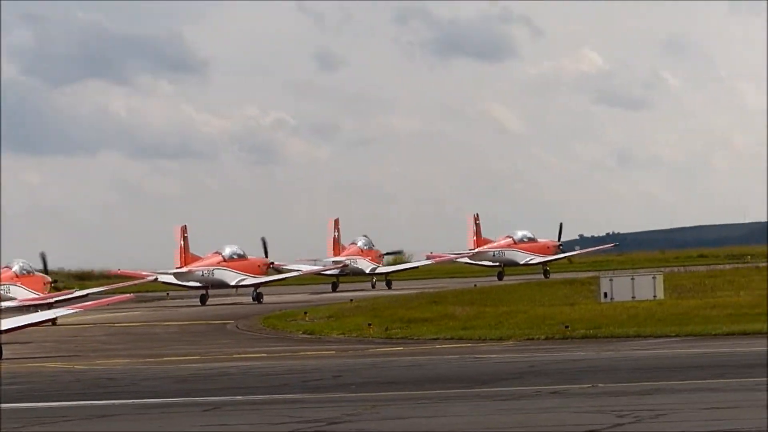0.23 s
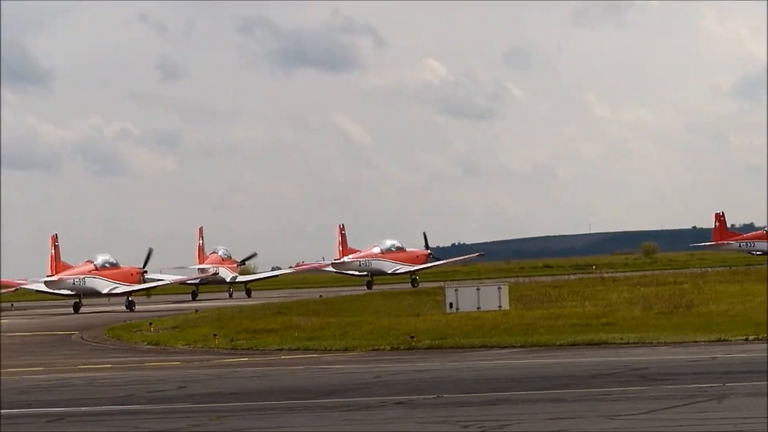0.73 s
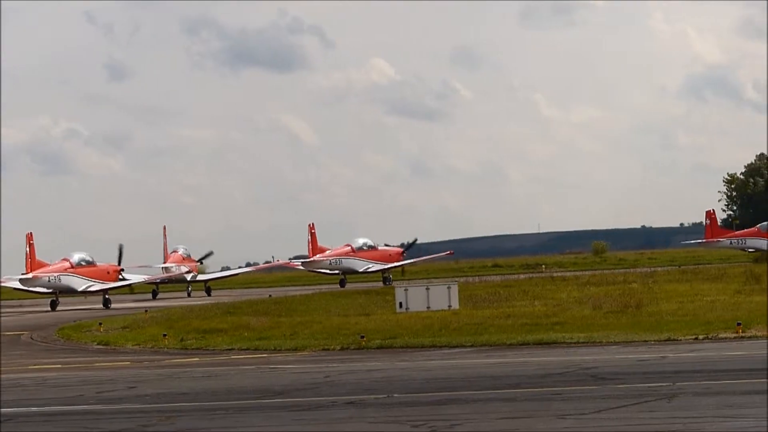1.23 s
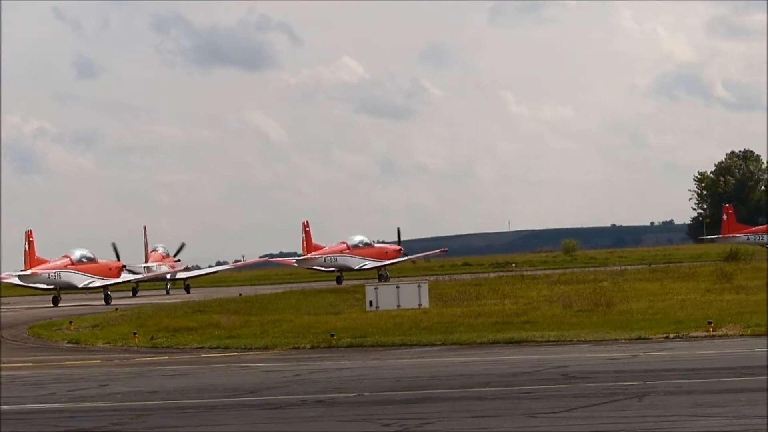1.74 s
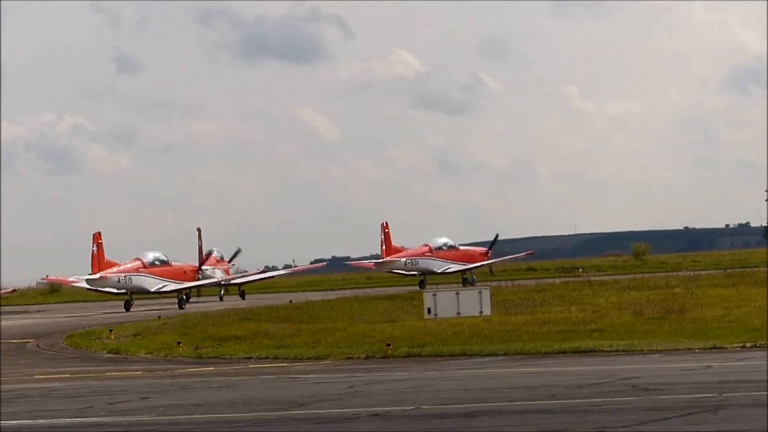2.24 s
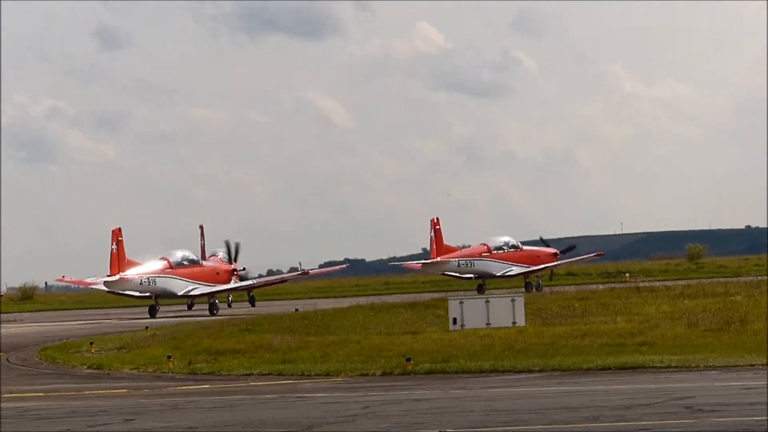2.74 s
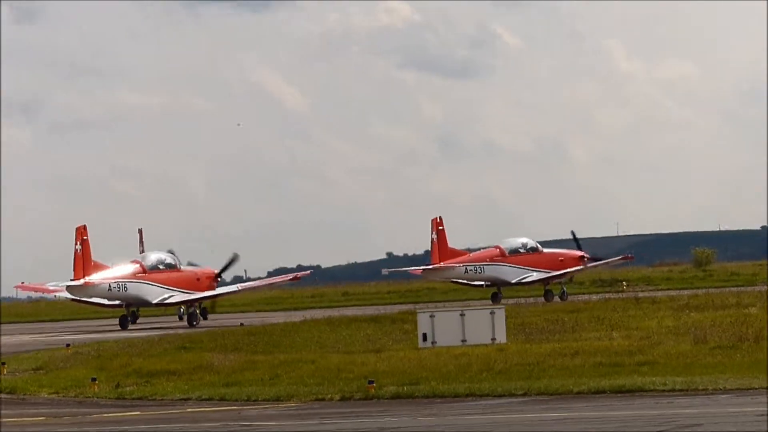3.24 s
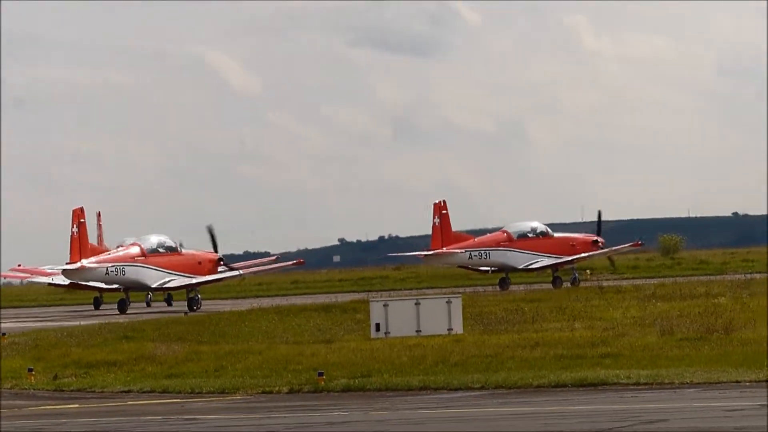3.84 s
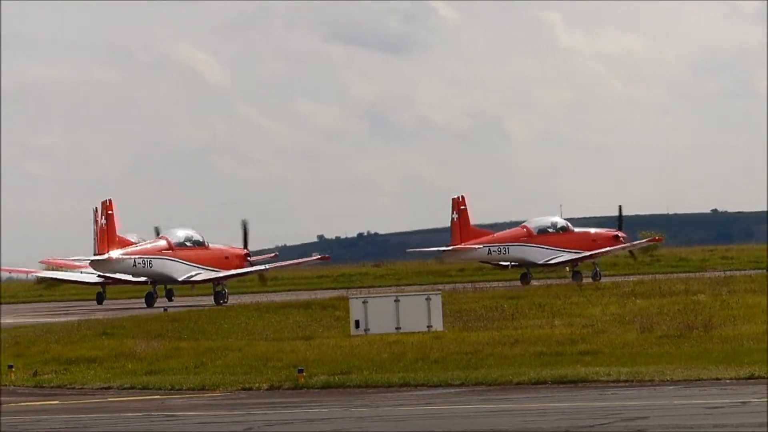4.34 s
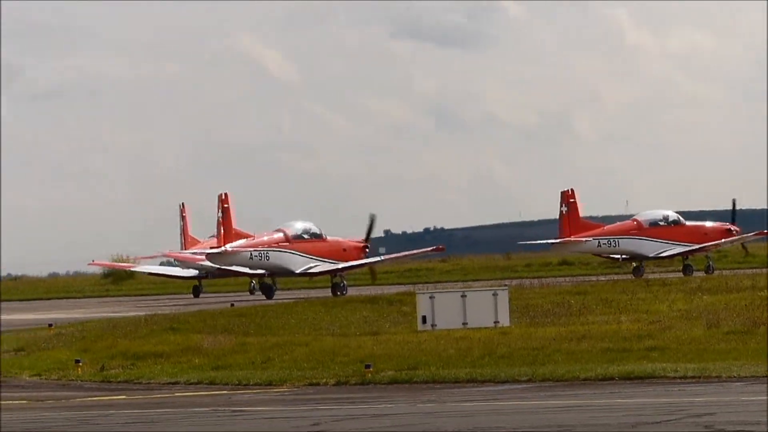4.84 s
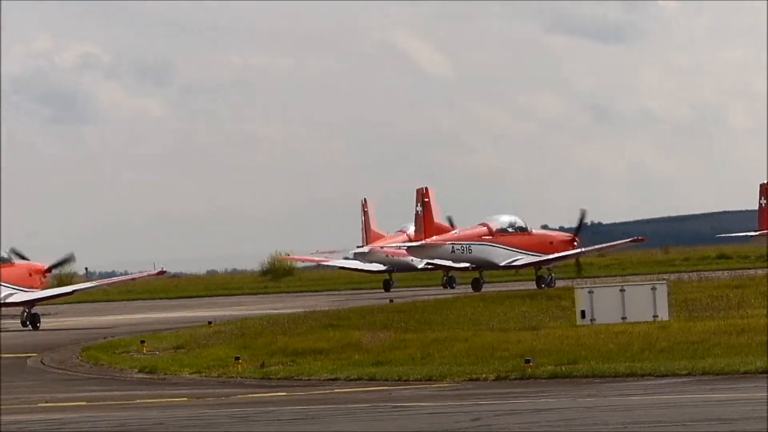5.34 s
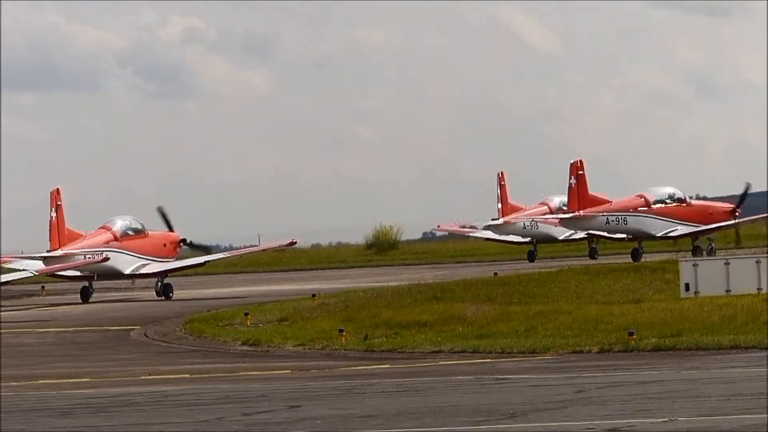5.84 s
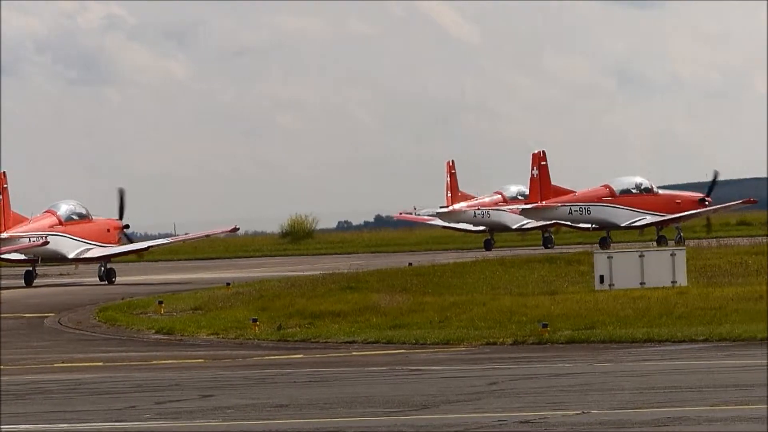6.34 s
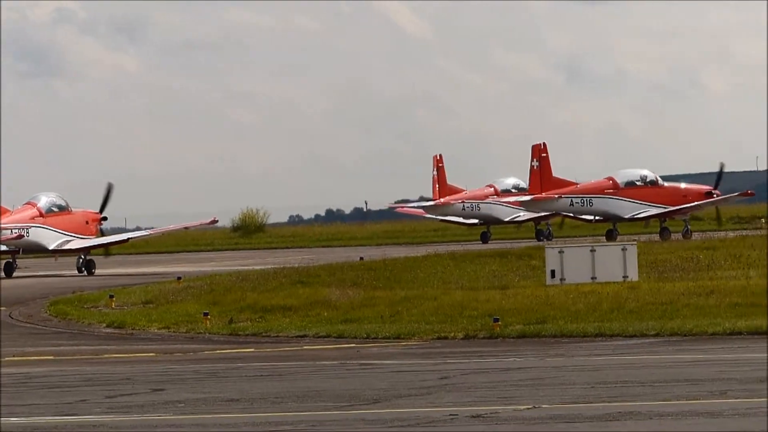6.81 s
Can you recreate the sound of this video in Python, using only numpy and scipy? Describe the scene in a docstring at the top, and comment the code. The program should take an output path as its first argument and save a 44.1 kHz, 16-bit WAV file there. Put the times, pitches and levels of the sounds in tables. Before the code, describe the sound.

For about seven seconds, several small turboprops taxi at idle across an open airfield, sounding throughout without a clear start or end. Dominant is a shrill, noisy whine near 2.4 kHz, fluttering rapidly, with strong surges around 0.4, 1.3, 3.3 and 5.8 seconds and a brief drop near 6.1. Higher fuzzy howls between 3.5 and 6 kHz swell separately, one from another plane surging just after 1 second and near 2.8. Broad, bright hiss fills the space around them. Thin wavering gear and compressor tones come and go faintly. Beneath, a subdued midrange exhaust roar, blended propeller buzz and weak deep rumble rise and dip unevenly. Distant stereo pickup, mostly central, light in deep bass and dulled at the very top; the low end widens from 0.25 to 2.3 and 3.8 to 6.4 seconds, snapping shut each time.

```python
"""Across an airfield, several small turboprops taxi at idle power, picked up in stereo from a distance.
Turbulent air howls in the intake ducts: noise ringing in narrow resonances over the broad blade hiss.
Below lie exhaust roar and rumble, shaped noise, and the buzz of three propellers, stacks of harmonics.
Thin wavering sines are the gears and compressors. Each part swells and fades;
the low end often dips when the whine is loud."""
import sys
import numpy as np
from scipy import signal
from scipy.fft import rfft, irfft
from scipy.io import wavfile
from scipy.ndimage import uniform_filter1d

SR = 44100
rng = np.random.default_rng(int(sys.argv[2]) if len(sys.argv) > 2 else 0)


def int16_out(signal):
    """Quantize to a 16-bit WAV file."""
    q = np.round(np.clip(np.atleast_2d(signal).T, -1, 1) * 32767)
    wavfile.write(sys.argv[1], SR, q.astype(np.int16))


N = 311828  # length [samples]

# Levels are those ahead of the microphone; random wander is added where a function says so.
# deep exhaust rumble, relative density: (frequency [Hz], density [dB per Hz])
RUMBLE_SPECTRUM = [(25, -24), (60, -41), (146, -1), (230, -5), (336, -11.5), (600, -26)]
# exhaust roar, relative density: (frequency [Hz], density [dB per Hz])
ROAR_SPECTRUM = [(150, -23), (300, -17.5), (450, -3), (750, 2), (1300, 3), (1800, 3.5), (3000, -33.5),
                 (6000, -43)]
# swells and dips of the low end: (time [s], roar level [dB], rumble level [dB])
LOW_END_LEVELS = [(0.0, -43.5, -52), (0.27, -42, -62), (0.57, -41, -50), (1.04, -40, -56),
                  (1.24, -45.5, -61), (2.48, -40, -51), (3.33, -46, -51), (3.42, -43, -47),
                  (3.72, -46.5, -59.5), (4.0, -40.5, -50.5), (4.47, -41, -57.5), (5.26, -41, -51),
                  (5.44, -45, -57), (5.63, -43, -53), (5.77, -48, -56), (5.98, -45, -48),
                  (6.26, -39, -48.5), (7.07, -40.5, -52)]
# broad weak resonance under the whine: (centre [Hz], width [Hz])
RUSH_RESONANCE = (1920, 170)
RUSH_DB, RUSH_SHARE = -40.5, 0.75  # mean level [dB]; share of the other plane's swells

# blade passing rate of each propeller: (rate [Hz])
BLADE_RATES = [75.3, 74.54, 76.3]
# propeller buzz, peak of each harmonic against the roar: (frequency [Hz], level [dB])
BUZZ_HARMONICS = [(150, -24), (300, -29.5), (450, -22), (750, -19), (1200, -33.5)]

# low gear, high gear and compressor tones: (pitch [Hz])
CLEAR_PITCHES = [1417, 1648, 7190]
# gear tones: (time [s], low gear level [dB], high gear level [dB])
GEAR_LEVELS = [(0.0, -47, -47), (0.04, -53, -38), (0.65, -49, -45), (0.71, -57, -57), (0.87, -43, -44),
               (1.26, -50.5, -52), (2.07, -53, -46), (2.15, -64, -53), (2.87, -50, -53), (3.17, -65, -58),
               (4.15, -59, -45), (4.31, -52, -52), (5.06, -45.5, -42.5), (5.38, -47, -59), (5.49, -56, -54),
               (6.1, -56, -55), (6.34, -44, -55), (6.56, -51, -40), (6.91, -55, -50), (7.07, -48, -43)]
COMPRESSOR_DB, COMPRESSOR_SHARE = -48.5, 2.6  # mean level [dB]; exaggerates the swells of the hiss
# fainter tones of the other engines: (pitch [Hz])
FAINT_PITCHES = [1447, 1468, 1491, 1636, 4043, 4192, 7262, 7292]
# the same tones, before their wander: (rms level [dB])
FAINT_LEVELS = [-53, -59, -57, -58, -50, -51, -53, -55]

# hiss of the compressor blades, relative density: (frequency [Hz], density [dB per Hz])
HISS_SPECTRUM = [(1200, -23), (1800, -34), (2700, 10), (4000, 7), (4370, -25), (5200, 10), (6500, -0.5),
                 (7500, 1), (9600, 2.5), (13800, -19)]
# weaker resonances that follow the hiss: (centre [Hz], width [Hz], level against the hiss [dB])
MINOR_RESONANCES = [(2905, 530, -7.5), (5150, 280, -8), (6930, 490, -11), (8290, 710, -8.5)]
# hiss with its minor resonances: (time [s], level [dB])
HISS_LEVELS = [(0.0, -31.5), (0.16, -30.5), (0.21, -33), (0.75, -31.5), (0.96, -29.5), (1.34, -36),
               (1.61, -31.5), (3.21, -31.5), (3.56, -30.5), (3.6, -27.5), (3.7, -34.5), (4.08, -31),
               (4.53, -28.5), (4.65, -33.5), (4.77, -28.5), (5.59, -31), (5.91, -33.5), (6.02, -29.5),
               (6.58, -32), (7.07, -28.5)]
# intake duct resonances, lowest first: (centre [Hz], width [Hz])
DUCT_RESONANCES = [(2352, 69), (3455, 134), (4060, 400), (4740, 226), (5790, 380)]
# main whine, the lowest duct resonance, swelling and fading: (time [s], level [dB])
WHINE_LEVELS = [(0.0, -30), (0.16, -22.5), (0.2, -28.5), (0.41, -21), (0.47, -31), (1.26, -21), (1.77, -28),
                (1.83, -30), (1.89, -26.5), (2.58, -28), (2.62, -22), (2.83, -31), (2.93, -22), (3.15, -27),
                (3.25, -18), (3.37, -30.5), (3.46, -21), (3.56, -25), (3.66, -20), (3.9, -31.5),
                (3.94, -24), (4.67, -23), (5.38, -27.5), (5.77, -19), (6.08, -33.5), (6.24, -20.5),
                (6.28, -25), (6.61, -25.5), (6.67, -32), (7.07, -23)]
# second duct resonance: (time [s], level [dB])
SECOND_LEVELS = [(0.0, -30), (0.69, -36.5), (1.0, -28.5), (1.99, -35.5), (3.13, -30), (3.27, -37),
                 (3.35, -26.5), (3.44, -35), (3.68, -27), (3.86, -37), (4.09, -29), (4.13, -36),
                 (5.79, -28.5), (6.04, -39), (6.36, -28.5), (6.67, -39), (6.75, -29), (6.91, -34.5),
                 (6.95, -26), (7.07, -33)]
# middle duct resonance, from another plane and swelling on its own: (time [s], level [dB])
OTHER_PLANE_LEVELS = [(0.0, -34.5), (1.0, -31.5), (1.04, -24.5), (1.44, -39), (1.56, -31), (2.7, -34),
                      (2.79, -26.5), (3.27, -40), (3.44, -29), (3.86, -36), (3.92, -32.5), (5.04, -27.5),
                      (5.3, -39.5), (6.2, -31.5), (6.26, -36), (6.44, -29.5), (6.56, -43), (7.07, -36)]
# top two duct resonances, mostly swelling together: (time [s], lower level [dB], upper level [dB])
TOP_HOWL_LEVELS = [(0.0, -32, -30), (0.14, -25.5, -26), (0.31, -33, -31.5), (0.9, -32, -31.5),
                   (0.94, -27, -24.5), (1.26, -31.5, -32), (2.83, -33.5, -32.5), (3.09, -27.5, -27.5),
                   (3.17, -38, -33.5), (3.4, -27.5, -28.5), (3.48, -35, -35.5), (3.6, -29, -24.5),
                   (3.76, -29.5, -34), (3.88, -28.5, -28), (3.94, -34, -32.5), (4.17, -29, -28.5),
                   (4.67, -33.5, -31.5), (5.24, -29.5, -29), (5.83, -33, -28), (5.89, -33, -35),
                   (6.97, -31.5, -29), (7.07, -28, -34)]
WANDER_DB, WANDER_HZ = 1.49, 9.9  # of duct howls, rush and compressor tone: rms [dB], rate [Hz]

# spells in which the low end widens slowly and snaps back to the centre: (start [s], end [s])
WIDE_SPELLS = [(.25, 2.32), (3.8, 6.42)]
OPEN_S, OPEN_SHARE, SNAP_S = .25, .4, .04  # quick opening [s], width it reaches, closing [s]
# phase lead of the left channel at the widest: (frequency [Hz], lead [rad])
LEFT_LEAD = [(40, .05), (120, 0.13), (300, 0.95), (700, 0.42), (1290, 0.041), (2300, 0.0022),
             (13000, 0.0033)]
# excess of the left channel at the widest: (frequency [Hz], share of the sound)
LEFT_EXCESS = [(40, 0), (125, -0.089), (250, -0.29), (500, 0.11), (1000, 0)]
# microphone's bass cut and narrow dip, top dulled by distance and microphone: (frequency [Hz], gain [dB])
MICROPHONE_RESPONSE = [(40, -7), (110, 1.5), (4200, 1.5), (4370, -4), (4560, 3.5), (8000, 4.5), (10000, 2),
                       (11500, 1), (12800, -6), (13800, -13)]
EDGE_HZ = 13900  # band limit of the recorder


def gain_of(db):
    """Amplitude factor of a level in dB."""
    return 10 ** (np.asarray(db) / 20)


def evened(x):
    """Scale a signal to rms 1."""
    return x / np.sqrt(np.mean(x ** 2) + 1e-20)


def read(points, hz):
    """Value of a spectrum at hz, on a log-frequency axis."""
    f, value = np.transpose(points)
    return np.interp(np.log(hz + 1), np.log(f + 1), value)


def columns(rows):
    """Every level column of a time table, one value per sample."""
    s, *values = np.transpose(rows)
    return [np.interp(np.arange(N) / SR, s, v) for v in values]


def drift(rate_hz):
    """Random wander of rms 1: white noise low-passed near rate_hz."""
    spectrum = rfft(rng.standard_normal(N))
    lowpass = np.exp(-(np.fft.rfftfreq(N, 1 / SR) / rate_hz) ** 2)
    return evened(irfft(spectrum * lowpass, N))


def wandering(db):
    """A level with its own random wander."""
    return db + WANDER_DB * drift(WANDER_HZ)


def follow(rows, mean_db, share):
    """A wandering level that takes a share of the swells of another layer."""
    db = columns(rows)[0]
    return wandering(mean_db + share * (db - db.mean()))


def patchy_noise(spectrum, patchy_db):
    """Turbulence: noise of a given colour whose level wanders in patches of time and frequency."""
    frames, hz = N // 256 + 5, np.fft.rfftfreq(1024, 1 / SR)
    real, imaginary, patches = rng.standard_normal((frames, 513, 3)).T
    patches = uniform_filter1d(patches, size=14, axis=0)  # across frequency bins
    patches = evened(uniform_filter1d(patches, size=20, axis=1))  # across frames
    level_db = read(spectrum, hz)[:, None] + patchy_db * patches
    bins = (real + 1j * imaginary) * gain_of(level_db)
    return signal.istft(bins, nperseg=1024, noverlap=768)[1][:N]


def howl(hz, width_hz, steady):
    """Noise ringing in one resonance: a fuzzy whistle, its slowest wander partly evened out."""
    off = (np.fft.rfftfreq(N, 1 / SR) - hz) / width_hz
    resonance = np.exp(-(off / 6.84) ** 2) / (1 + 2j * off)  # the exponential trims the far skirts
    ring = irfft(rfft(rng.standard_normal(N)) * resonance, N)
    power = uniform_filter1d(uniform_filter1d(ring ** 2, size=2200), size=2200)
    return evened(ring / power ** (steady / 2))


def tone(hz, waver_hz):
    """A sine of rms 1 whose pitch wavers slightly."""
    turns = np.cumsum(hz + waver_hz * drift(6.2)) / SR
    return np.sqrt(2) * np.sin(2 * np.pi * (turns + rng.random()))


def propellers():
    """Harmonics of each blade rate; every harmonic fades in and out on its own path."""
    buzz = np.zeros(N)
    for hz in BLADE_RATES:
        turns = np.cumsum(hz + .4 * drift(2.48)) / SR
        for k in range(2, 17):
            level_db = read(BUZZ_HARMONICS, k * hz) + 3.3 * drift(6.2)
            buzz += gain_of(level_db) * np.sin(2 * np.pi * (k * turns + rng.random()))
    return buzz


def exhausts():
    """Turbulent roar with the propeller buzz inside it, a deep rumble and a resonant rush."""
    roar_db, rumble_db = columns(LOW_END_LEVELS)
    roar = evened(patchy_noise(ROAR_SPECTRUM, patchy_db=1.53))
    rumble = evened(patchy_noise(RUMBLE_SPECTRUM, patchy_db=.8))
    rush_db = follow(OTHER_PLANE_LEVELS, RUSH_DB, RUSH_SHARE)
    rush = gain_of(rush_db) * howl(*RUSH_RESONANCE, steady=0.16)
    return gain_of(roar_db) * (roar + propellers()) + gain_of(rumble_db) * rumble + rush


def rotors():
    """Thin tones from gears and compressor stages; the highest waver most in Hz."""
    compressor_db = follow(HISS_LEVELS, COMPRESSOR_DB, COMPRESSOR_SHARE)
    levels = columns(GEAR_LEVELS) + [compressor_db]
    clear = sum(gain_of(db) * tone(hz, hz * 0.001483) for db, hz in zip(levels, CLEAR_PITCHES))
    faint = sum(gain_of(db + 2.0 * drift(5.5)) * tone(hz, hz * 0.001215)
                for hz, db in zip(FAINT_PITCHES, FAINT_LEVELS))
    return clear + faint


def blade_hiss():
    """Broad patchy noise of the compressor blades, coloured by minor resonances."""
    hiss = evened(patchy_noise(HISS_SPECTRUM, patchy_db=1.3))
    for hz, width_hz, db in MINOR_RESONANCES:
        hiss = hiss + gain_of(db + 2.0 * drift(10.0)) * howl(hz, width_hz, steady=0.1)
    return gain_of(columns(HISS_LEVELS)[0]) * evened(hiss)


def intakes():
    """Turbulent air howls in the duct resonances over the blade hiss."""
    levels = columns(WHINE_LEVELS) + columns(SECOND_LEVELS)
    levels += columns(OTHER_PLANE_LEVELS) + columns(TOP_HOWL_LEVELS)
    ducts = sum(gain_of(wandering(db)) * howl(hz, width_hz, steady=0.25)
                for db, (hz, width_hz) in zip(levels, DUCT_RESONANCES))
    return blade_hiss() + ducts


def width():
    """Share of the full stereo difference: opens quickly part way, grows steadily, snaps shut."""
    t = np.arange(N) / SR
    return sum(np.interp(t, [start, start + OPEN_S, end, end + SNAP_S], [0, OPEN_SHARE, 1, 0])
               for start, end in WIDE_SPELLS)


def scene():
    """All sources in the centre, plus a level and phase difference between left and right."""
    middle = exhausts() + rotors() + intakes()
    hz = np.fft.rfftfreq(N, 1 / SR)
    difference = read(LEFT_EXCESS, hz) + 1j * read(LEFT_LEAD, hz) / 2  # 1j: a quarter turn ahead
    apart = width() * irfft(rfft(middle) * difference, N)
    return np.array([middle + apart, middle - apart])


def record(dry):
    """Colour of distance and microphone, then the band limit of the recorder."""
    response = gain_of(read(MICROPHONE_RESPONSE, np.fft.rfftfreq(N, 1 / SR)))
    coloured = irfft(rfft(dry) * response, N)
    lowpass = signal.firwin(511, EDGE_HZ, window=("kaiser", 9), fs=SR)
    return signal.oaconvolve(coloured, lowpass[None], "same")


dry = scene()
out = record(dry)
int16_out(out)
```